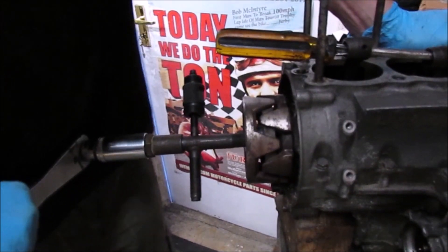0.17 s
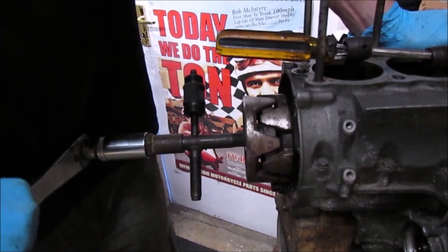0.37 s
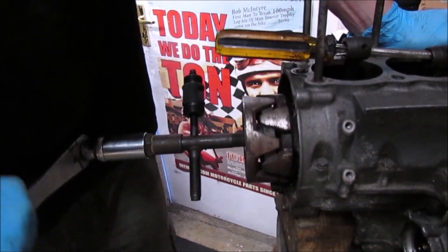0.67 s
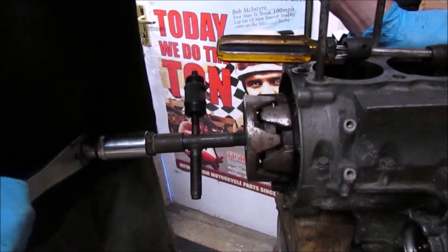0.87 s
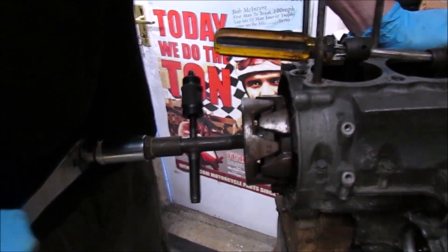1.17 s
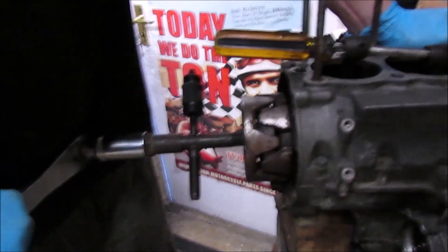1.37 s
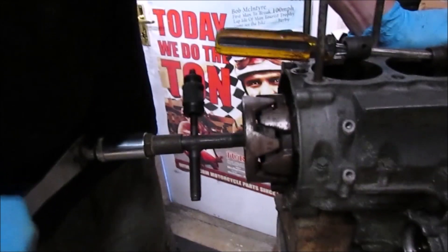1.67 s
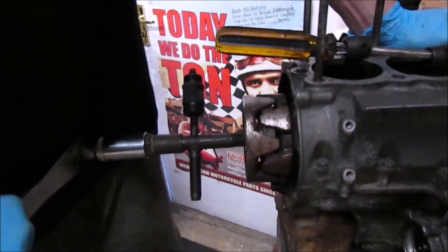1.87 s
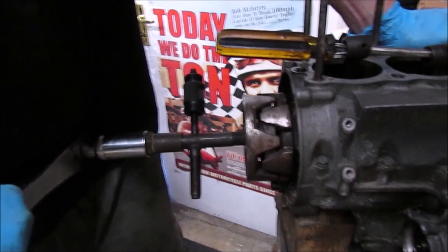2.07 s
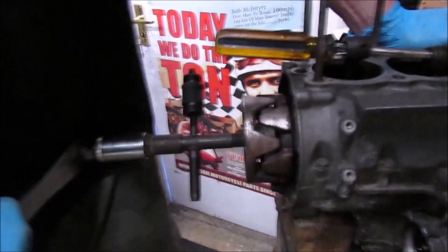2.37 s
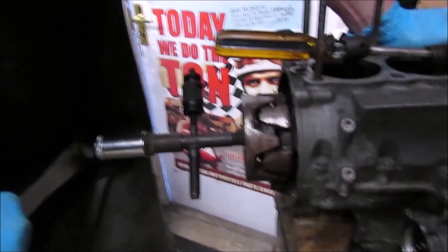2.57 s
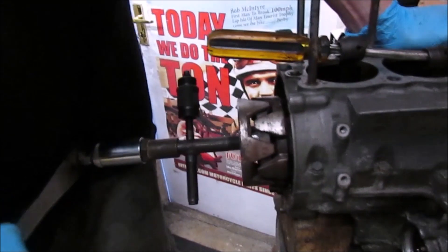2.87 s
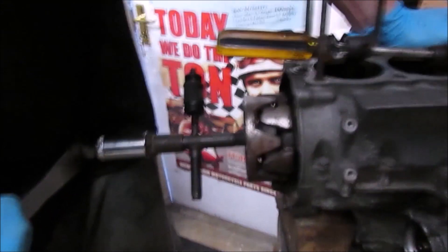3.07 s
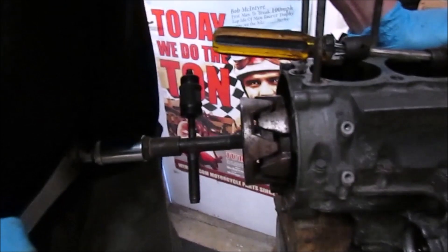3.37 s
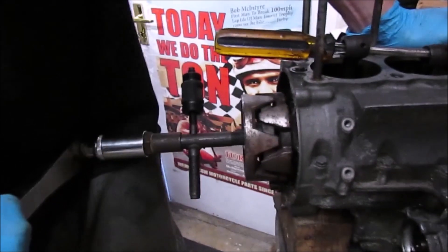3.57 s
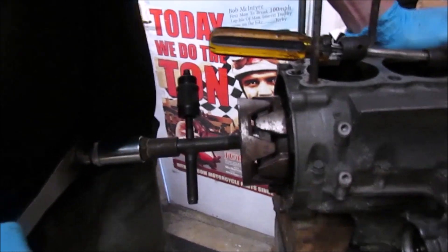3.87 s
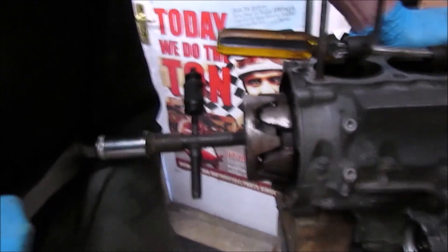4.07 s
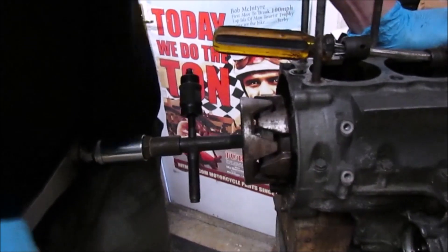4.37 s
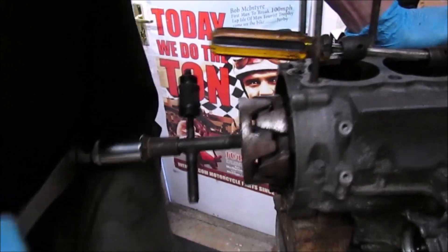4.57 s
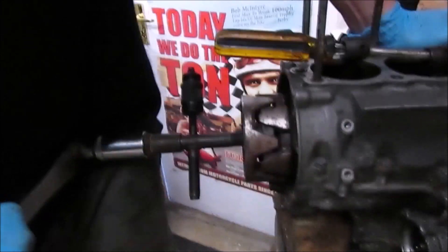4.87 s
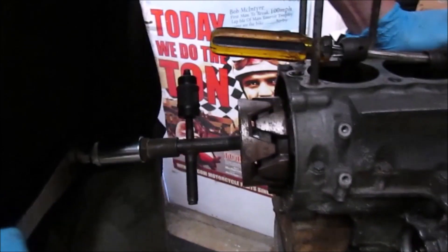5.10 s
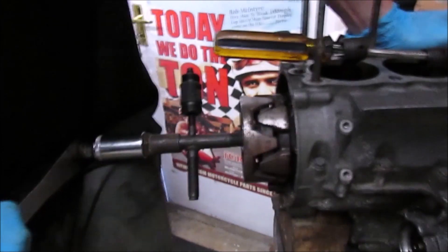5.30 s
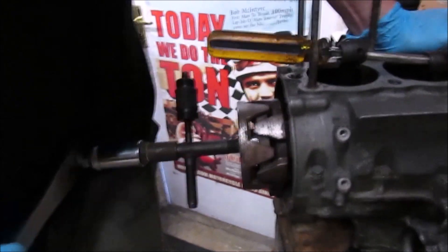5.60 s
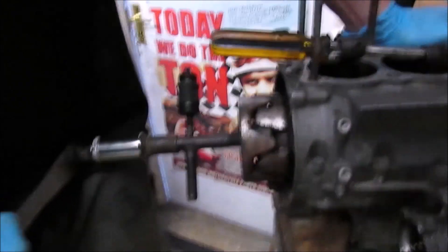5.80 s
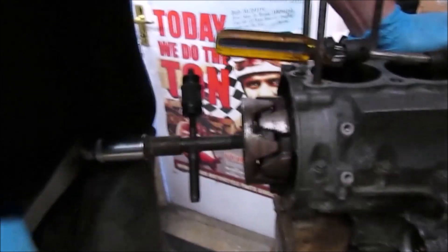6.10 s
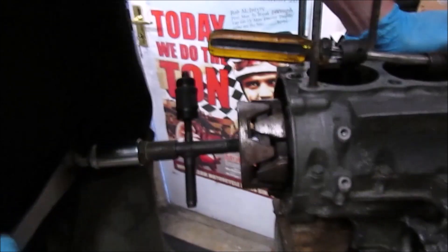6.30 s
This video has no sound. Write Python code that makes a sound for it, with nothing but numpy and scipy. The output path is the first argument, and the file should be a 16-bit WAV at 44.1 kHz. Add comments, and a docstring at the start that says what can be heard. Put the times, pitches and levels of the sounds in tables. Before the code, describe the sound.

Close, heavy metalwork in a small garage: irregular low thuds and gritty creaking shudders, rattling block knocks, wrench clacks, then a sudden loud crack.

```python
"""Ratchet wrench on a stiff bolt

A wrench winds the bolt of a puller on an engine block, close by in a small garage. Each stroke is an impact
that rings bench modes in a dull thump, while noise of random micro-slips makes the thread shudder and grind.
The block drops back with a modal knock and a rattle; the wrench clacks in its play, bright slips tick and
the glove swishes. Once the loaded steel lets go with a sharp crack: a single blow on the puller's modes.
Filtered noise gives the room's rumble and the hiss, and a sine a thin electronic whine."""
import sys
import numpy as np
from scipy import signal
from scipy.fft import rfft, irfft, next_fast_len
from scipy.io import wavfile
from scipy.ndimage import uniform_filter1d

SR = 44100
rng = np.random.default_rng(int(sys.argv[2]) if len(sys.argv) > 2 else 0)


def wrap_up_sound(samples):
    """Save the sound to the file named by the first command line argument, as 16-bit audio."""
    columns = np.atleast_2d(samples).T
    # keep every value between -1 and 1, then stretch to whole-number steps
    tamed = np.clip(columns, -1, 1)
    steps = np.round(tamed * 32767).astype(np.int16)
    wavfile.write(sys.argv[1], SR, steps)


N = 284312  # length in samples
HIT_TIME = np.arange(2 ** 14) / SR  # time axis of one impact, s

# Pushes on the wrench. Each row: start in seconds, time held in seconds, then the levels of
# thump, shudder, grinding and grit in dB.
STROKES = [(0.278, .06, -58, -54.5, -64, -87), (0.76, 0.042, -47, -51, -58, -84),
           (1.398, .02, -28, -42.5, -52, -66.5), (2.434, 0.04, -28, -42, -49.5, -69),
           (3.052, 0.1, -32, -37.5, -42.5, -58.5), (3.582, 0.018, -40, -56, -57.5, -73),
           (4.088, 0.051, -26.5, -41, -49.5, -68.5), (4.703, 0.12, -32, -37, -43, -61),
           (5.248, 0.077, -31, -45, -54.5, -88), (5.37, 0.035, -53, -57, -53.5, -93),
           (5.844, .11, -32.5, -43, -45.5, -58)]
# The block drops back and rattles. Each row: start in seconds, level, rattle level and treble level in dB.
KNOCKS = [(1.807, -39.5, -49, -59.5), (2.002, -48.5, -52, -65), (2.309, -31.5, -39, -50),
          (3.456, -26.5, -37, -45), (3.959, -36.5, -44, -56.5), (4.524, -28, -36, -44.5),
          (5.11, -33.5, -40, -50.5), (5.63, -34.5, -46.5, -57.5), (6.004, -36.5, -44.5, -56),
          (6.246, -29, -40, -51)]
# Wrench and socket close their play. Each row: start in seconds, level in dB, treble level in dB.
CLACKS = [(0.278, -53.5, -86), (0.341, -56, -85), (0.76, -46, -72), (1.377, -51, -88), (1.544, -53.5, -64),
          (1.794, -52, -63), (2.288, -48.5, -62.5), (2.529, -50, -61.5), (2.568, -44.5, -81.5),
          (2.79, -46.5, -87), (3.142, -34, -63), (3.253, -44, -71), (3.34, -47.5, -72), (3.625, -44.5, -74),
          (3.876, -48.5, -74), (4.194, -49.5, -85), (4.483, -43.5, -63.5), (4.718, -46, -64),
          (4.755, -39, -65), (4.795, -31, -73), (5.003, -36.5, -69), (5.326, -36.5, -79), (5.39, -48, -75),
          (5.555, -48.5, -80), (5.93, -32.5, -54), (5.945, -43, -52), (6.185, -37.5, -52.5)]
# Dry ticks from the thread. Each row: start in seconds, level in dB.
TICKS = [(1.4226, -64), (2.471, -58), (3.063, -53.5), (3.272, -60), (4.8468, -46.5), (5.2976, -56.5),
         (5.8643, -54), (5.921, -52)]
# The loaded steel lets go. Each row: start in seconds, level in dB.
CRACKS = [(4.8206, -15.5)]
# The glove slides on the handle. Each row: middle in seconds, half length in seconds, level in dB.
GLOVE_SLIDES = [(0.86, 0.053, -64.5), (1.317, 0.021, -65.5), (2.883, 0.035, -59), (3.963, 0.039, -64)]

# Modes of the rocking bench, the dropping block, its rattle, the wrench and the puller.
# Each row: frequency in Hz, relative gain in dB, decay time t60 in seconds.
BENCH_MODES = [(65, -17.5, 0.9), (98.3, -7, 0.18), (124.6, -0.5, 0.055), (204, -8.5, 0.077),
               (255.6, -10, 0.052), (397, -9, 0.059), (427, -10.5, 0.03)]
BLOCK_MODES = [(109.4, -18, 0.12), (203.4, 0, 0.026), (250, -2.5, 0.039), (395, -20.5, 0.0099)]
RATTLE_MODES = [(444, 1, 0.036), (646, 0, 0.033), (831, 5.5, 0.02), (1298, -4.5, 0.045), (1540, 6.5, 0.019),
                (1704, -1, 0.042), (2230, -6.5, 0.0037)]
WRENCH_MODES = [(265, -10.5, 0.049), (495, -4, 0.02), (543, 1.5, 0.0091), (910, -1, 0.019),
                (952, -6, 0.022), (1254, -9.5, 0.012), (1670, -19, 0.012)]
PULLER_MODES = [(300, 1.5, 0.013), (510, -7, 0.013), (630, -8, 0.022), (767, 2.5, 0.014), (970, 3, 0.02),
                (1470, -5.5, 0.012), (2410, -10, 0.017), (3030, -9, 0.021), (3350, -9.5, 0.019),
                (4070, -32, 0.0048), (6250, -8, 0.0056), (8900, -23, .008)]

# Spectra of the crowd of heavily damped casting modes, of the bright contact noise, and of the thread's
# shudder, grind and bass sway. Each row: frequency in Hz, relative density in dB per Hz.
CASTING_SPECTRUM = [(120, -19.5), (280, 9.5), (500, 6), (900, 4.5), (1200, -10), (1650, -3.5),
                    (2000, -21.5), (3000, -26), (4500, -30), (8000, -37)]
CONTACT_SPECTRUM = [(900, -13), (1900, 12), (2800, 4), (4500, 6), (5500, -1), (7000, 1), (10500, -1.5),
                    (13000, -6.5), (16000, -8.5)]
SHUDDER_SPECTRUM = [(20, -38), (35, -15), (50, -7.5), (68, 0.5), (125, -4), (170, -5), (240, -4.5),
                    (380, -18.5), (600, -27.5), (1200, -71.5)]
GRIND_SPECTRUM = [(150, -22.5), (350, 0.5), (600, -4), (900, -8.5), (1200, -10), (1600, -9), (2000, -29),
                  (3000, -26.5), (6000, -64)]
SWAY_SPECTRUM = [(12, -25), (25, 8), (36, 9), (60, -10), (150, -50)]
# Spectra of the room noise in mid and side. Each row: frequency in Hz, relative density in dB per Hz.
ROOM_MID_SPECTRUM = [(12, -31), (20, -11.5), (74, 0.5), (142, -7.5), (172, -16), (210, -11.5), (277, -20),
                     (310, -17.5), (472, -23.5), (513, -23.5), (1330, -30), (1610, -30.5), (2600, -39.5),
                     (5000, -43.5), (6360, -41), (11000, -44), (16000, -51.5)]
ROOM_SIDE_SPECTRUM = [(12, -48), (20, -12.5), (81, -11), (154, -15.5), (177, -2), (228, -8.5), (270, -24),
                      (319, -5), (459, -7.5), (759, -10.5), (825, -11.5), (1260, -14.5), (2670, -32),
                      (10500, -35.5), (16000, -40)]
# Level of the low rumble. Each row: time in seconds, level in dB.
RUMBLE_LEVEL = [(0, -57.5), (.5, -53.5), (1.1, -56), (1.85, -64.5), (2.4, -52.5), (3.3, -52), (3.8, -53.5),
                (4.8, -52), (5.3, -59), (6, -60.5), (6.45, -54.5)]
# Stereo width, greatest in the midrange. Each row: frequency in Hz, side over mid in dB.
WIDTH = [(40, -25), (120, -6), (230, -9), (450, 5.5), (800, -1.5), (1600, -4), (2600, -3.5), (5000, -12),
         (9000, -4), (16000, -4)]
# Phase lead of the side signal for a source to the right. Each row: frequency in Hz, lead in radians.
SIDE_LEAD = [(120, 0.69), (260, 0.37), (500, 1.67), (900, 0.4), (1600, 0.78), (2500, 1.9), (16000, 0.78)]

# The load comes on, builds while the push is held, then eases; the thread creeps on a little longer.
ATTACK_S, BUILD_DB_PER_S = 0.012, 33
SHUDDER_RELEASE_S, GRIND_RELEASE_S, GRIT_RELEASE_S = 0.079, 0.052, 0.065
CREEP_DB, CREEP_S = -16, 0.22
SLIP_LAG_S = 0.005  # grit starts to crackle just after the block has taken the load
SWAY_DB = -38.5  # bass sway of the bench where the shudder is strongest
# Faint clacks follow each push at random as the load eases.
SETTLE_WITHIN_S, SETTLE_DB, SETTLE_TREBLE_DB = 0.15, -56.5, -71
# Light touches ring the socket before the first hard push, while the wrench is still slack.
PING_COUNT, PING_DB, SLACK_S = 6, -62, 1.3
ROOM_DB, ROOM_SIDE_DB = -51.5, -59  # the mid's lows are later reset to RUMBLE_LEVEL
WHINE_HZ, WHINE_DB = 15734, -91
# The limiter ducks at once and recovers slowly.
LIMIT_DB, RECOVER_DB_PER_S = -24.5, 3.5
CUTOFF_HZ = 15900


def thumps():
    """Impact excitation of low modes: each push rocks block and bench, which tip and fall back more weakly."""
    out = np.zeros((2, N))
    for start, _, db, *_ in STROKES:
        for delay, weaker_db, contact_hz in [(0, 0, 348), (0.023, -5.5, 483)]:
            force = blow(near_db=-7, near_t60=0.1, room_db=-11, room_t60=0.35, bounce_s=0.008, keep=0.55, count=2)
            swing = loudest_one(ring(soften(force, contact_hz), BENCH_MODES, vary_db=1.0))
            # the swing takes a moment to build up
            add(out, start + delay - 0.004, from_db(db + weaker_db) * swing)
    return out


def thread():
    """Stick-slip friction: the loaded thread creeps in tiny slips that shudder, grind, crackle and sway."""
    # slips come in clumps of a few milliseconds
    slow_noise = rms_one(soften(rng.standard_normal(N), contact_hz=90))
    clumps = rms_one(from_db(4 * slow_noise))
    shudder = rms_one(colour(grains(per_s=1600, spread_db=0.5), SHUDDER_SPECTRUM))
    grind = rms_one(colour(clumps * grains(per_s=1400, spread_db=1.5), GRIND_SPECTRUM))
    grit = rms_one(colour(clumps * grains(per_s=10000, spread_db=-3.0), CONTACT_SPECTRUM))
    sway = rms_one(colour(rng.standard_normal((2, N)), SWAY_SPECTRUM))

    shudder_level, grind_level, grit_level = np.zeros((3, N))
    for start, held, _, shudder_db, grind_db, grit_db in STROKES:
        shudder_level += from_db(shudder_db) * load(start, held, SHUDDER_RELEASE_S)
        grind_level += from_db(grind_db) * load(start, held, GRIND_RELEASE_S)
        grit_level += from_db(grit_db) * load(start + SLIP_LAG_S, held, GRIT_RELEASE_S)
    # the sway grows with the square of the shudder's level
    sway_level = from_db(SWAY_DB) * (shudder_level / shudder_level.max()) ** 2
    return shudder_level * shudder + grind_level * grind + grit_level * grit + sway_level * sway


def load(start, held, release_s):
    """Loading and relaxation of one push: attack, slow build to 1, exponential release and lingering creep."""
    t = np.arange(N) / SR - start
    building = np.clip(t / ATTACK_S, 0, 1) * from_db(BUILD_DB_PER_S * np.minimum(t - held, 0))
    after = np.maximum(t - held, 0)
    creep = from_db(CREEP_DB) * np.exp(-after / CREEP_S)
    return building * np.maximum(np.exp(-after / release_s), creep)


def grains(per_s, spread_db):
    """Shot noise: random micro-slips of uneven size and either sign, at shared instants in mid and side."""
    unevenness = np.minimum(rng.exponential(1, (2, N)), 4)
    sizes = from_db(spread_db * unevenness) * rng.choice([-1, 1], (2, N))
    return sizes * (rng.random(N) < per_s / SR)


def knocks():
    """Repeated impact: the block lands dully on its modes, and loose steel chatters in five waning touches."""
    out = np.zeros((2, N))
    for start, db, rattle_db, treble_db in KNOCKS:
        landing = blow(near_db=-9, near_t60=0.04, room_db=-15, room_t60=0.2)
        block = loudest_one(ring(soften(landing, contact_hz=450), BLOCK_MODES, vary_db=2.3))
        add(out, start - 0.001, from_db(db) * block)

        chatter = blow(near_db=4, near_t60=0.03, room_db=-11, room_t60=0.14, bounce_s=0.0046, keep=0.7, count=5)
        steel = loudest_one(ring(soften(chatter, contact_hz=2500), RATTLE_MODES, vary_db=0.5))
        casting = loudest_one(colour(scatter(t60=0.13), CASTING_SPECTRUM))
        add(out, start + 0.003, from_db(rattle_db) * (steel + from_db(-3) * casting))

        # every touch also crushes a little grit
        strength = np.sqrt(np.abs(uniform_filter1d(chatter[0] ** 2, size=66)))
        pressure = strength * (1 - np.exp(-HIT_TIME / 0.0023))
        crunch = pressure * rng.standard_normal(chatter.shape)
        add(out, start + 0.002, from_db(treble_db) * loudest_one(colour(crunch, CONTACT_SPECTRUM)))
    return out


def clacks():
    """Impact across a clearance: oily steel closes its play in a double touch, and faintly after each push."""
    out = np.zeros((2, N))
    settling = [(start + held + SETTLE_WITHIN_S * rng.random(), SETTLE_DB, SETTLE_TREBLE_DB)
                for start, held, *_ in STROKES]
    for start, db, treble_db in list(CLACKS) + settling:
        force = blow(near_db=2, near_t60=0.035, room_db=-11, room_t60=0.2, bounce_s=0.0023, keep=0.5, count=2)
        steel = loudest_one(ring(soften(force, contact_hz=1570), WRENCH_MODES, vary_db=3.3))
        casting = loudest_one(colour(scatter(t60=0.16), CASTING_SPECTRUM))
        add(out, start, from_db(db) * (steel + from_db(-6.0) * casting))
        scuff = scatter(t60=0.21) * (1 - np.exp(-HIT_TIME / 0.00037))
        add(out, start, from_db(treble_db) * loudest_one(colour(scuff, CONTACT_SPECTRUM)))
    return out


def cracks():
    """Sudden release of strain: one hard slip sets the whole puller ringing for an instant."""
    out = np.zeros((2, N))
    for start, db in CRACKS:
        force = blow(near_db=-8, near_t60=0.02, room_db=-15, room_t60=0.13)
        steel = loudest_one(ring(force, PULLER_MODES, vary_db=5.5))
        casting = from_db(-12) * loudest_one(colour(scatter(t60=0.078), CASTING_SPECTRUM))
        snap = from_db(-26) * loudest_one(colour(force, CONTACT_SPECTRUM))
        spray = from_db(-20) * loudest_one(colour(scatter(t60=0.09), CONTACT_SPECTRUM))
        add(out, start, from_db(db) * (steel + casting + snap + spray))
    return out


def ticks():
    """Isolated micro-slip: the thread gives a short bright burst of decaying noise."""
    out = np.zeros((2, N))
    for start, db in TICKS:
        slip = scatter(t60=0.12) * (1 - np.exp(-HIT_TIME / 0.0003))
        add(out, start, from_db(db) * loudest_one(colour(slip, CONTACT_SPECTRUM)))
    return out


def pings():
    """Resonance of a single mode: light touches at random moments ring the socket."""
    out = np.zeros((2, N))
    for start in rng.uniform(0, SLACK_S, PING_COUNT):
        ping = ring(scatter(t60=0.046), [(1627, 0, 0.025)], vary_db=0)
        add(out, start, from_db(PING_DB) * loudest_one(ping))
    return out


def glove():
    """Sliding friction: dense grains swell and fade with the speed of the shifting grip."""
    t = np.arange(N) / SR
    speed = sum(from_db(db) * np.exp(-((t - middle) / half) ** 2) for middle, half, db in GLOVE_SLIDES)
    return speed * rms_one(colour(grains(per_s=14000, spread_db=0.5), CONTACT_SPECTRUM))


def background():
    """Stationary noise and a pure tone: room rumble of wandering level, microphone hiss, electronic whine."""
    t = np.arange(N) / SR
    mid = from_db(ROOM_DB) * rms_one(colour(rng.standard_normal(N), ROOM_MID_SPECTRUM))
    side = from_db(ROOM_SIDE_DB) * rms_one(colour(rng.standard_normal(N), ROOM_SIDE_SPECTRUM))
    lows = signal.sosfiltfilt(signal.butter(2, 190, fs=SR, output="sos"), mid)
    rumble = from_db(np.interp(t, *np.transpose(RUMBLE_LEVEL))) * rms_one(lows)
    whine = from_db(WHINE_DB) * np.sqrt(2) * np.sin(2 * np.pi * WHINE_HZ * t)
    return np.array([mid - lows + rumble + whine, side])


def blow(near_db, near_t60, room_db, room_t60, bounce_s=0.005, keep=0.0, count=1):
    """Impact and reflection: a contact and its bounces, followed by echoes from the bench and the garage."""
    touches = np.zeros((1, len(HIT_TIME)))
    gaps = bounce_s * rng.uniform(0.85, 1.15, count)
    instants = ((np.cumsum(gaps) - gaps[0]) * SR).astype(int)
    touches[0, instants] = min(keep, 1) ** np.arange(count)
    # levels and decay times hold before the flattening and fade below
    paths = from_db(near_db) * scatter(near_t60) + from_db(room_db) * scatter(room_t60)
    paths[0, 0] += 1  # the direct path
    paths = flatten_spectrum(paths, room_t60) * np.linspace(1, 0, len(HIT_TIME)) ** 2
    return signal.fftconvolve(touches, paths, axes=1)[:, :len(HIT_TIME)]


def scatter(t60):
    """Diffuse reverberation: a dying cloud of reflections, mid and side, scaled to a mid of energy 1."""
    cloud = rng.standard_normal((2, len(HIT_TIME))) * from_db(-60 * HIT_TIME / t60)
    return cloud / np.sqrt(np.sum(cloud[0] ** 2))


def flatten_spectrum(paths, t60):
    """Many paths together favour no pitch: equalise the magnitudes, keep the phases, and damp the tail."""
    spectrum = rfft(paths)
    size = np.abs(spectrum) + 1e-12
    flat = irfft(spectrum / size * size.mean(axis=1, keepdims=True))
    return flat * from_db(-20 * HIT_TIME / t60)


def soften(x, contact_hz):
    """Contact compliance: a soft contact passes little above its corner frequency."""
    return signal.sosfilt(signal.butter(2, min(contact_hz, SR / 3), fs=SR, output="sos"), x)


def ring(force, modes, vary_db):
    """Modal superposition: damped resonators of alternating sign, with gains that vary at every strike."""
    out = 0
    for k, (hz, db, t60) in enumerate(modes):
        radius = from_db(-60 / (t60 * SR))
        angle = 2 * np.pi * hz / SR
        gain = from_db(db + vary_db * rng.standard_normal()) * (-1) ** k
        poles = [1, -2 * radius * np.cos(angle), radius * radius]
        out = out + gain * signal.lfilter([1, 0, -1], poles, force)
    return out


def colour(x, spectrum):
    """Minimum-phase filtering: the folded cepstrum gives a causal filter that follows a table of (Hz, dB)."""
    n = next_fast_len(x.shape[-1] // 2 + 2 ** 11) * 2
    hz, db = np.transpose(spectrum)
    grid = np.maximum(np.fft.rfftfreq(n, 1 / SR), 1)
    cepstrum = irfft(np.log(from_db(np.interp(np.log(grid), np.log(hz), db))))
    cepstrum[1:n // 2] *= 2
    cepstrum[n // 2 + 1:] = 0
    return irfft(rfft(x, n) * np.exp(rfft(cepstrum)))[..., :x.shape[-1]]


def from_db(db):
    """Logarithmic level: decibels to amplitude gain."""
    return 10 ** (np.asarray(db) / 20)


def rms_one(x):
    """Effective value: scale to rms 1."""
    return x / np.sqrt(np.mean(x ** 2) + 1e-20)


def loudest_one(x):
    """Short-time power: scale a mid-side pair so that the loudest 8 ms of its mid have rms 1."""
    return x / np.sqrt(uniform_filter1d(x[0] ** 2, size=353).max() + 1e-20)


def add(out, start_s, x):
    """Linear superposition: mix a sound in at a time."""
    start = max(round(start_s * SR), 0)
    out[:, start:start + x.shape[1]] += x[:, :N - start]


def placed(x, off_axis, diffuse_db):
    """Stereo level and phase cues: the side of a source to the right is an inverted, phase-turned mid."""
    n = next_fast_len(N)
    lead = np.interp(np.fft.rfftfreq(n, 1 / SR), *np.transpose(SIDE_LEAD))
    direct = -off_axis * irfft(rfft(x[0], n) * np.exp(1j * lead), n)[:N]
    # WIDTH scales both the direct and the diffuse part
    return np.array([x[0], colour(direct + from_db(diffuse_db) * x[1], WIDTH)])


def limiter(x):
    """Gain reduction with slow release: power over the limit turns the gain down, and it creeps back steadily."""
    power = uniform_filter1d(x.mean(axis=0) ** 2, size=353)
    over_db = np.maximum(10 * np.log10(np.maximum(power, 1e-12)) - LIMIT_DB, 0)
    recovered_db = RECOVER_DB_PER_S * np.arange(N) / SR
    return x * from_db(recovered_db - np.maximum.accumulate(over_db + recovered_db))


def scene():
    """Mid-side stereophony: all sources are summed as mid and side, then turned into left and right."""
    mid, side = (placed(thumps(), off_axis=0.12, diffuse_db=-43)
                 + placed(thread() + ticks() + pings() + glove(), off_axis=0.34, diffuse_db=-1)
                 + placed(knocks(), off_axis=1.24, diffuse_db=4.0)
                 + placed(clacks(), off_axis=1.0, diffuse_db=1.0)
                 + placed(cracks(), off_axis=0.91, diffuse_db=4.5)
                 + background())
    return np.array([mid + side, mid - side])


def record(dry):
    """Band limiting and limiting: the deepest rumble is cut, peaks are ducked, then the top is cut."""
    without_depths = signal.sosfilt(signal.butter(2, 22, "high", fs=SR, output="sos"), dry)
    limited = limiter(without_depths)
    return signal.sosfilt(signal.ellip(10, 0.2, 70, CUTOFF_HZ, fs=SR, output="sos"), limited)


dry = scene()
out = record(dry)
wrap_up_sound(out)
```